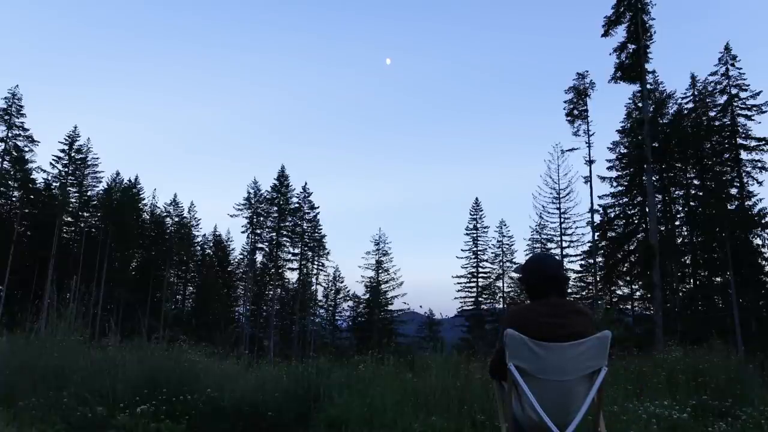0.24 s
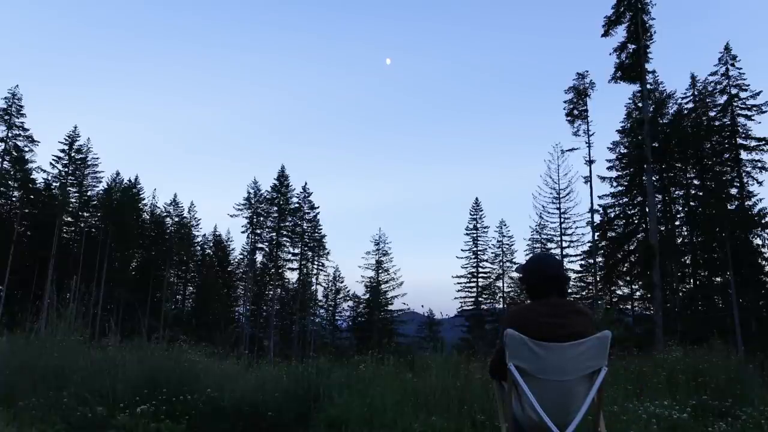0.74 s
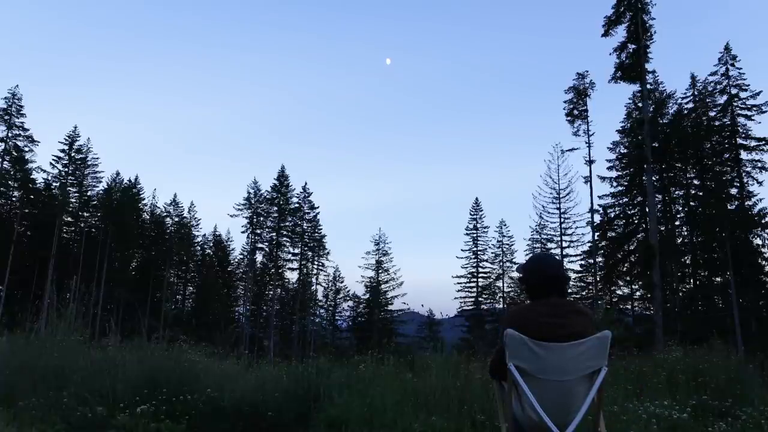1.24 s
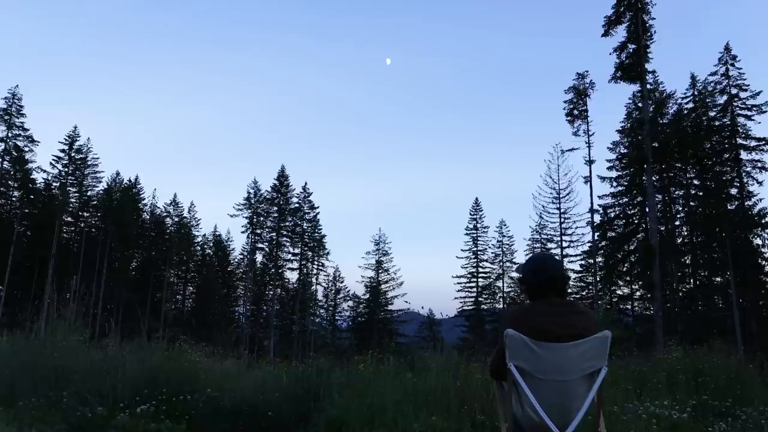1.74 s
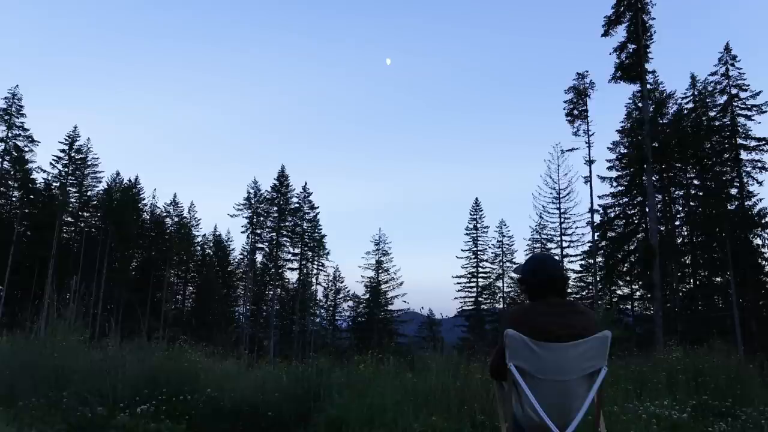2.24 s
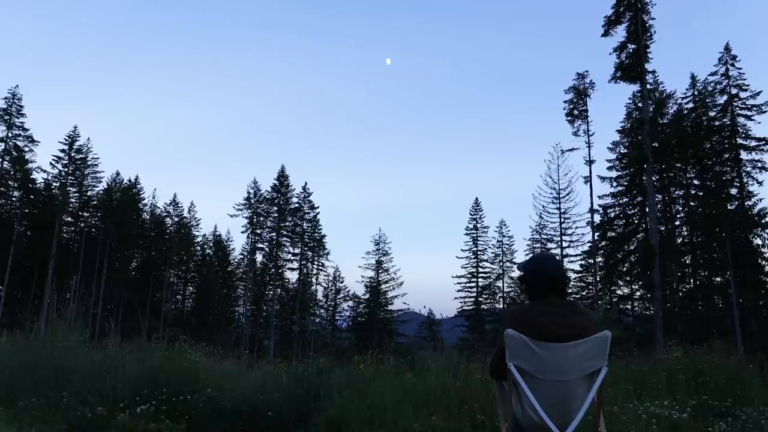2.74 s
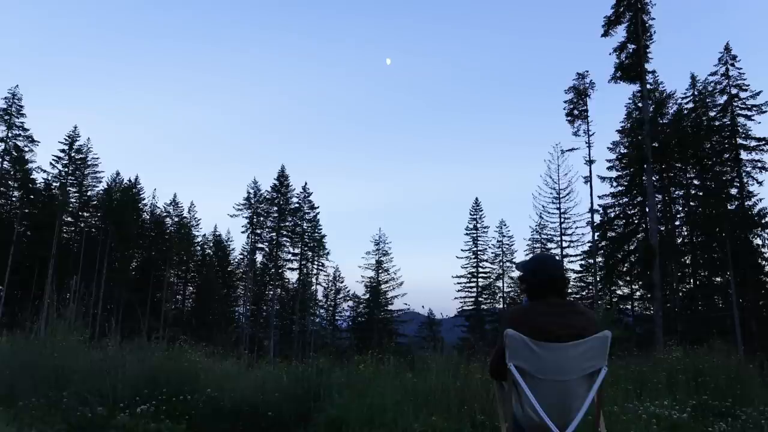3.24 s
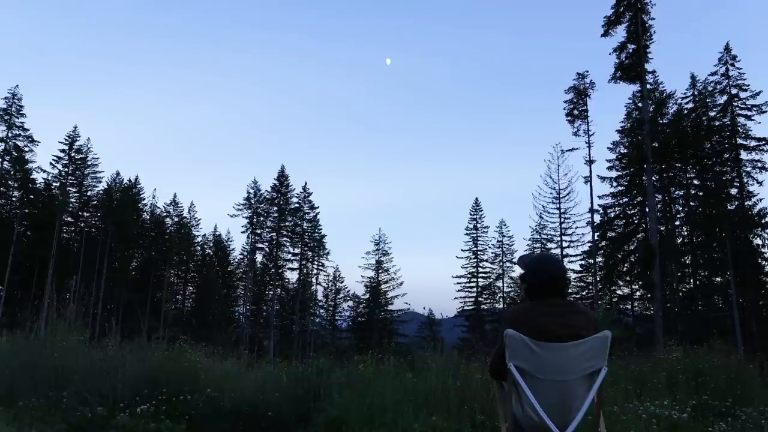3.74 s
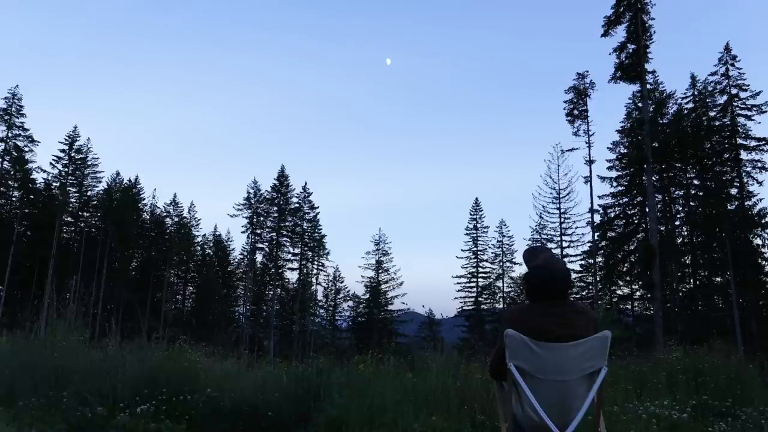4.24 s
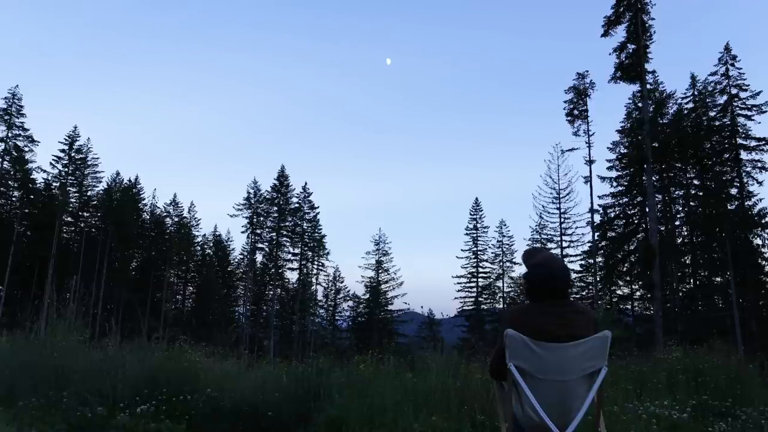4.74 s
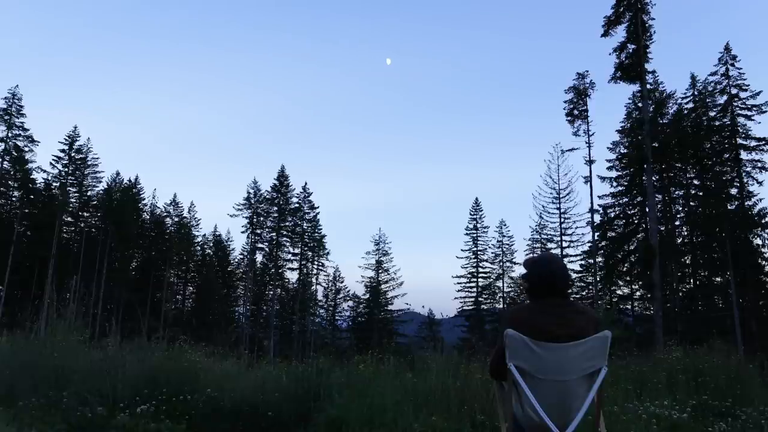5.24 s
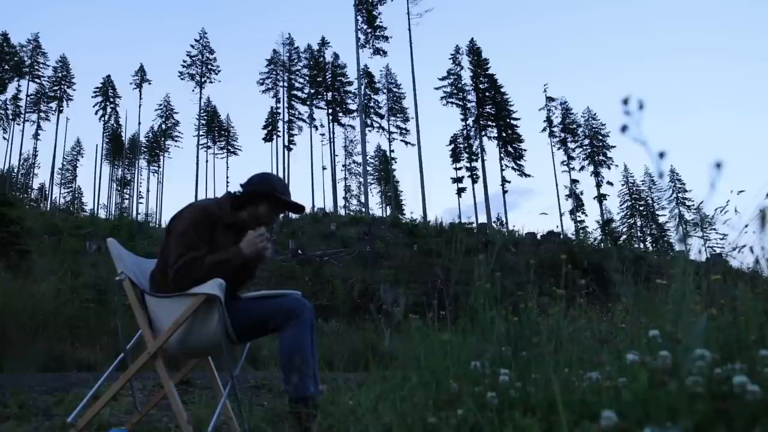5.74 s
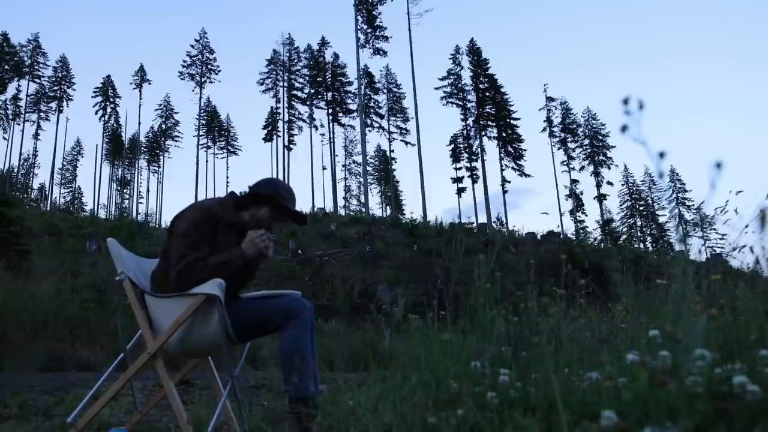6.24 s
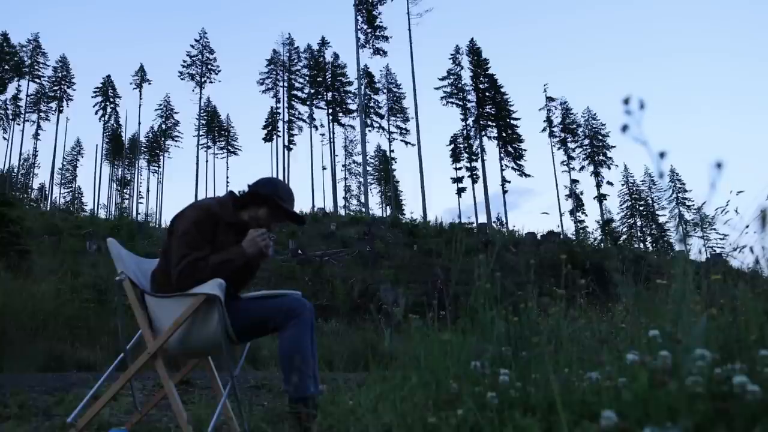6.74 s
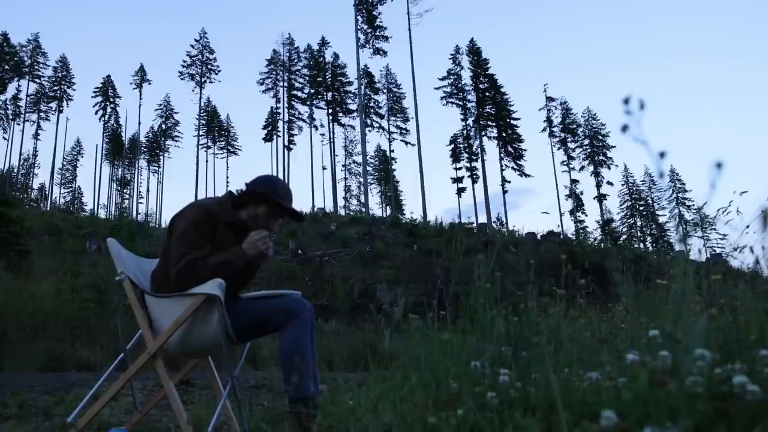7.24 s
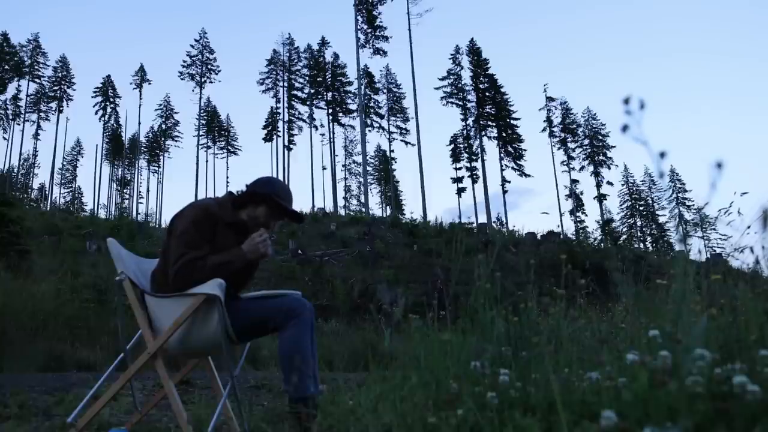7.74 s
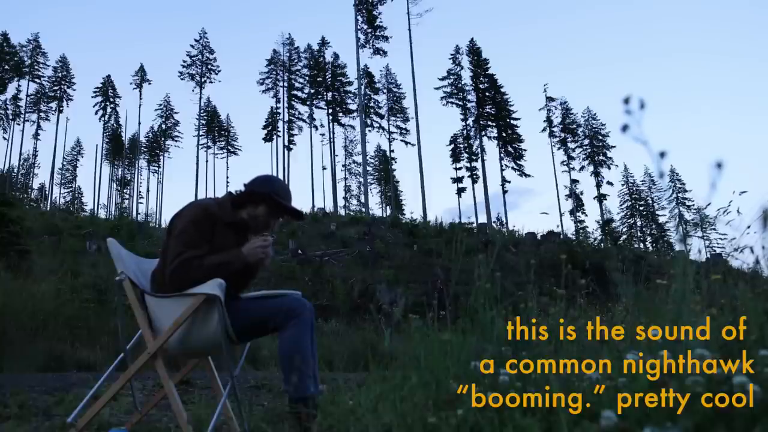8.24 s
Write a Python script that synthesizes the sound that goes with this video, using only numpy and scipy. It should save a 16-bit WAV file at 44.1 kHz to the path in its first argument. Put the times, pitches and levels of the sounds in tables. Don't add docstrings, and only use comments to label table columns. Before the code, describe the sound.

A folding chair snaps loudly, then nasal buzzing nighthawk calls cross a quiet dusk clearing until a diving bird's wings boom at the end.

```python
import sys
import numpy as np
from scipy import signal
from scipy.fft import rfft, irfft, next_fast_len
from scipy.io import wavfile
from scipy.ndimage import uniform_filter1d, map_coordinates

SR = 44100
rng = np.random.default_rng(int(sys.argv[2]) if len(sys.argv) > 2 else 0)


def volts_from_db(level):
    exponent = np.asarray(level, float) / 20
    return 10 ** exponent


def digitize_waveform(pressure):
    field = np.atleast_2d(pressure).T
    bounded = np.clip(field, -1, 1)
    quanta = np.round(bounded * 32767).astype(np.int16)
    wavfile.write(sys.argv[1], SR, quanta)


N = 375291


def unit(x):
    return x / np.sqrt(np.mean(x ** 2) + 1e-20)


def along(points, hz):
    f, v = np.transpose(points)
    return np.interp(np.log(hz + 1), np.log(f + 1), v)


def curves(rows, t):
    s, *cols = np.transpose(rows)
    return [np.interp(t, s, c) for c in cols]


def wobble(rate, size):
    knots = rng.standard_normal(int(size * rate / SR) + 4)
    return map_coordinates(knots, [np.arange(size) * rate / SR])


def filtered(x, response):
    m = next_fast_len(x.shape[-1] + 8192)
    spectrum = rfft(x, m) * response(np.fft.rfftfreq(m, 1 / SR))
    return irfft(spectrum, m)[..., :x.shape[-1]]


def coloured(x, spectrum):
    lo, hi = spectrum[0][0], spectrum[-1][0]
    return unit(filtered(x, lambda hz: volts_from_db(along(spectrum, hz)) * (hz >= lo) * (hz <= hi)))


def add(track, s, x):
    part = track[round(s * SR):][:len(x)]
    part += x[:len(part)]


def swells(rows, rest_db):
    t = np.arange(0, N, 64) / SR
    power = volts_from_db(2 * rest_db)
    for s, spread, db in rows:
        power = power + volts_from_db(2 * db) * np.exp(-((t - s) / spread) ** 2)
    return np.interp(np.arange(N) / SR, t, np.sqrt(power))


def echo(x, t60, gap):
    longest_s = np.clip(np.max(t60, axis=0)[1], .05, 1)
    hz, t, z = signal.stft(rng.standard_normal(round(SR * longest_s)), SR, nperseg=256)
    fade = volts_from_db(-60 * t / along(t60, hz)[:, None])
    tail = signal.istft(z * fade, SR, nperseg=256)[1]
    return signal.fftconvolve(np.pad(x, (round(gap * SR), 0)), tail / np.linalg.norm(tail))


# (time [s], level [dB])
ROAD_LEVEL = [
    (0.0, -60.5),
    (0.09, -63.5),
    (3.65, -56),
    (3.82, -54),
    (5.95, -50),
    (6.71, -51.5),
    (7.27, -52.5),
    (8.51, -49),
]
# (frequency [Hz], level over the traffic [dB], strongest at [s], spread [s], gain there [dB])
ENGINE_LINES = [
    (119.1, -8, 5.9, 0.29, 6),
    (195.2, -9.5, 7.7, 0.84, 11.5),
]
# (time [s], spread [s], level [dB])
AIR_PUFFS = [
    (.42, .15, -57),
    (1.21, .13, -54),
    (3.3, .8, -71),
    (4.66, .1, -55.5),
    (5.5, .1, -65),
    (6.35, .15, -60),
    (7.5, .4, -56.5),
]
# (frequency [Hz], level [dB])
HUM_COLOUR = [(24, -43.5), (40, -9.5), (107, 1), (151, -1), (193, -0.5), (209, -1), (237, -9), (268, -12),
              (489, -29.5), (600, -24), (780, -48), (1320, -120)]
# (frequency [Hz], level [dB])
HISS_COLOUR = [(150, -10.5), (250, -5), (340, -6.5), (418, -7), (569, -10.5), (675, -12), (2280, -18.5),
               (2950, -20.5), (6710, -24), (12900, -37.5), (15000, -45.5)]
# (frequency [Hz], level [dB])
PORT_COLOUR = [(15, 6), (40, -5.5), (80, -9.5), (150, -39.5)]
# (frequency [Hz], level [dB])
APART_COLOUR = [(18, -46.5), (30, -9.5), (110, -7.5), (235, -11), (1080, -14), (1220, -25), (1580, -13.5),
                (5480, -12), (13000, -25.5)]
HISS_DB, HISS_RISE_DB_PER_S = -64.5, 1.1325
CALM_DB = -76.5


def air():
    t = np.arange(N) / SR
    road_db, = curves(ROAD_LEVEL, t)
    hiss_db = HISS_DB + HISS_RISE_DB_PER_S * t
    puffs = swells(AIR_PUFFS, CALM_DB)
    noise = lambda: rng.standard_normal(N)
    hum = volts_from_db(road_db - 0.5 + 2.4 * wobble(2.972, size=N)) * coloured(noise(), HUM_COLOUR)
    for hz, db, s, spread, gain_db in ENGINE_LINES:
        near_db = gain_db * np.exp(-((t - s) / spread) ** 2)
        line = unit(filtered(noise(), lambda f: np.exp(-((f - hz) / 4.9) ** 2)))
        hum = hum + volts_from_db(road_db + db + near_db) * line
    hiss = volts_from_db(hiss_db + .6 * wobble(7.7, size=N)) * coloured(noise(), HISS_COLOUR)
    rumble = puffs * coloured(noise(), PORT_COLOUR)
    side = volts_from_db(hiss_db - 18.0) * coloured(noise(), APART_COLOUR)
    side = side + volts_from_db(-24.5) * puffs * coloured(noise(), PORT_COLOUR)
    return hum + hiss + rumble + np.array([side, -side])


# (time [s], spread [s], rustle level [dB], brightness [dB])
SITTER_SHIFTS = [(.26, 0.14, -80, 28), (.45, 0.079, -63, 11), (.7, 0.16, -69, 14), (.94, 0.038, -66.5, 12),
                 (2.09, .04, -60, 3), (2.4, 0.48, -65.5, -6), (3.45, 0.12, -58.5, 2.5),
                 (4.15, 0.28, -63, 4), (5.06, .16, -53.5, -0.5), (5.44, 0.094, -48, 3),
                 (5.65, .14, -52.5, 0), (6.37, 0.12, -50.5, -2.5), (6.8, 0.35, -56, -0.5),
                 (7.3, 0.37, -69.5, 16.5)]
# (frequency [Hz], level [dB])
FABRIC_COLOUR = [(450, -25), (700, -2.5), (1000, 1), (1400, -5.5), (1700, -20)]
# (frequency [Hz], level [dB])
WEAVE_COLOUR = [(1300, -4.5), (1800, 0), (2500, -1.5), (5000, -12), (9000, -24)]
STILL_DB = -71


def cloth():
    rub = lambda: rng.standard_normal(N) * volts_from_db(1.94 * wobble(45, size=N))
    dull = [row[:3] for row in SITTER_SHIFTS]
    bright = [(s, spread, db + bright_db - 6) for s, spread, db, bright_db in SITTER_SHIFTS]
    body = swells(dull, STILL_DB) * coloured(rub(), FABRIC_COLOUR)
    scratch = swells(bright, STILL_DB + 0.5) * coloured(rub(), WEAVE_COLOUR)
    return body + scratch


def causal(gain):
    c = irfft(np.log(gain + 1e-6))
    half = len(c) // 2
    return np.exp(rfft(np.r_[c[0], 2 * c[1:half], np.zeros(len(c) - half)]))


# (time [s], peak [dB], low knock [dB], bright tick
# [dB])
JOINT_SNAPS = [(0.058, -30, -24, -17), (0.064, -17.5, -25, -10), (0.067, -21, -23, -6),
               (0.07, -20.5, -27, -25), (0.077, -28, -17, -11), (0.084, -18, -16, -13.5),
               (0.097, -24.5, -16.5, -10.5), (0.1349, 1, -14.5, -21), (0.921, -48, -5, -22),
               (0.925, -41.5, -19, -20.5), (0.937, -32.5, -6.5, -10.5), (0.944, -35, -11.5, -27.5),
               (0.123, -21.5, -18, -11),
    (0.132, -31.5, -11, -11),
]
# (frequency [Hz], level [dB])
JOINT_COLOUR = [(240, -66.5), (400, -33.5), (994, 3.5), (1270, 0.5), (1590, -18), (2220, -5), (2870, -18.5),
                (3290, -6.5), (4200, -19), (6510, -18), (8820, -24.5), (9660, -28.5), (15000, -61.5)]
# (time [s], peak [dB], ring [Hz], t60 [s])
FRAME_KNOCKS = [(0.36, -25.5, 1295, 0.025), (0.903, -39, 1190, 0.019), (1.252, -25, 1200, 0.026),
                (1.715, -51.5, 2220, 0.035), (2.047, -39, 710, 0.024), (2.067, -36, 814, 0.024),
                (2.089, -28.5, 2090, 0.016), (2.104, -39.5, 745, 0.021), (3.981, -44, 720, 0.016),
                (4.013, -45, 835, 0.022), (4.209, -53, 600, 0.012), (4.314, -42, 790, 0.019),
                (4.338, -43, 670, 0.017), (4.398, -36.5, 790, 0.018), (4.48, -48, 703, 0.039),
                (4.515, -47, 894, 0.04), (4.602, -37, 915, 0.023), (4.692, -39, 1020, 0.022),
                (4.711, -40.5, 540, 0.019), (5.269, -41, 929, 0.036), (5.704, -30, 776, 0.018),
                (6.194, -42, 700, 0.037), (6.218, -42, 874, 0.043), (6.348, -40, 920, 0.043),
                (7.403, -42.5, 620, 0.06), (7.434, -44, 2324, 0.04), (8.007, -50, 2660, 0.059)]
# (time [s], peak [dB], ring [Hz], t60 [s])
FITTING_PINGS = [
    (.921, -46, 5800, .008),
    (.938, -39, 5900, .01),
    (1.252, -40, 3000, .008),
    (5.769, -33, 5300, .007),
    (7.82, -45, 4400, .007),
    (7.841, -45, 4500, .007),
    (7.987, -42, 4500, .007),
    (8.006, -37, 4500, .007),
]
# (time [s], peak [dB], ring [Hz], t60 [s])
DRY_STEMS = [
    (4.0707, -46, 3780, 0.012),
    (4.103, -44, 2400, 0.01),
    (4.2082, -37.5, 3290, 0.012),
    (4.3268, -34.5, 3230, 0.0082),
    (4.3489, -42, 2850, 0.01),
    (4.3976, -34, 2530, 0.0082),
    (4.4682, -47, 2560, 0.011),
]


def joint_snap(low_db, high_db, t):
    crack = rng.standard_normal(len(t)) * (volts_from_db(-60 * t / 0.0065) + volts_from_db(-18.5 - 60 * t / 0.069))
    crack[0] = 9
    tilt = [(300, -20), (1000, low_db + 5.5), (2600, -3.0), (7000, high_db + 14.5)]
    snap = filtered(crack, lambda hz: causal(volts_from_db(along(JOINT_COLOUR, hz) + along(tilt, hz))))
    return snap / np.abs(snap).max()


def knock(hz, t60, t):
    ring = np.sin(2 * np.pi * hz * t)
    ring = ring + 0.23 * np.sin(2 * np.pi * 1.137 * hz * t) * rng.normal(1, 0.1)
    ring = ring * volts_from_db(-60 * t / t60) * (1 - np.exp(-t / 0.0003)) ** 2
    contact = volts_from_db(-60 * t / .006) * (1 - np.exp(-t * 2500))
    return ring + .06 * contact * coloured(rng.standard_normal(len(t)), WEAVE_COLOUR)


def chair():
    out, t = np.zeros(N), np.arange(SR // 8) / SR
    for s, db, low_db, high_db in JOINT_SNAPS:
        add(out, s, volts_from_db(db) * joint_snap(low_db, high_db, t))
    for s, db, hz, t60 in FRAME_KNOCKS + FITTING_PINGS + DRY_STEMS:
        add(out, s, volts_from_db(db) * knock(hz, t60, t))
    return out + volts_from_db(-27.5) * echo(out, [(500, 0.28), (3000, 0.31), (9000, 0.49)], gap=0.014)[:N]


BUZZ_HZ, DROP_SHARE = 227, .54
ATTACK_S, ATTACK_DB, RELEASE_S, RELEASE_DB = .03, -17, .028, -18
ARCH_HZ, ARCH_S, UPTURN_HZ = 420, .036, 300


def peent(length, db, swell_db, held_hz, closing_hz, reach_hz, skirt, glide_hz, hoarse):
    age = np.arange(0, length, 1 / SR)
    size, part = len(age), age / length

    closed = np.interp(part, [0, DROP_SHARE, DROP_SHARE + .25, 1], [0, .24, 1, .9])
    closed = uniform_filter1d(closed, size=901, mode="nearest")
    shut = np.exp(-(age / .014) ** 2)
    tip = np.clip((part - .82) / .18, 0, 1) ** 1.5
    beak = held_hz - closed * (held_hz - closing_hz) - glide_hz * shut

    whistle = held_hz + .58 * (beak - held_hz) + 160 * hoarse * wobble(149.65, size=size)
    whistle = whistle - ARCH_HZ * np.exp(-age / ARCH_S) + UPTURN_HZ * tip
    whistle = whistle + 40 * np.sin(2 * np.pi * 17 * age + 0.86 * wobble(8.85, size=size))
    rate = BUZZ_HZ * (1 + (0.0074 + 0.034 * hoarse) * wobble(67.7, size=size))

    k = np.arange(-24, 21)[:, None] / 2
    off = whistle + k * rate - beak
    reach = reach_hz * (1 - 0.5 * closed) / (1 + tip + 0.24 * shut)
    above = -9 * (off / reach) ** 2
    below = skirt * (1 + 0.77 * closed + 4 * tip + .6 * shut) * off / 1000
    spray = -16 - 12 * closed - 20 * shut - 6.5 * off / reach_hz
    shape = np.maximum(np.where(off > 0, above, below), np.where(off > 0, spray, -90))
    floor_hz = 2750 - glide_hz * np.exp(-age / 0.019)
    shape = shape - 12 * (np.maximum(floor_hz - beak - off, 0) / 300) ** 2

    uneven = 1.6 * hoarse ** 2 * (1 - .7 * closed) * np.abs(1 + .9 * wobble(55, size=size))
    halves = np.where(k % 1 == 0, 1, uneven)
    phase = 2 * np.pi * np.cumsum(whistle + k * rate, axis=1) / SR
    phase = phase + (0.08 + 0.17 * closed) * k ** 2
    wave = np.sum(volts_from_db(np.maximum(shape, -90)) * halves * np.exp(1j * phase), axis=0)
    wave = wave / np.sqrt(uniform_filter1d(np.abs(wave) ** 2, size=801) + 1e-9)
    voice = wave.real + volts_from_db(-43.0) * (wave ** 2).real

    ends = np.clip(np.minimum(age, age[::-1]) / .009, 0, 1)
    level_db = np.interp(age, [0, ATTACK_S, length - RELEASE_S, length], [ATTACK_DB, 0, 0, RELEASE_DB])
    level_db = level_db + swell_db * (part + closed - 1) / 2
    return volts_from_db(db + level_db) * ends * unit(voice)


# (time [s], length [s], level [dB], held whistle [Hz], comb spacing of the ground bounce [Hz])
LOW_CALLS = [
    (0.415, 0.36, -49, 3970, 784),
    (1.343, .25, -45, 4190, 746),
    (2.622, 0.36, -44.5, 4540, 657),
    (4.545, 0.37, -47, 4030, 780),
    (5.492, .3, -46.5, 4425, 522),
    (6.116, 0.24, -63, 4560, 740),
    (6.443, 0.34, -49, 4240, 665),
    (7.06, 0.35, -36.5, 4390, 586),
]
# (time [s], length [s], level [dB], held whistle [Hz], swell [dB])
HIDDEN_CALLS = [
    (1.86, 0.18, -63.5, 4140, 11.5),
    (2.05, 0.2, -73.5, 4270, 7),
    (3.34, 0.1, -60, 4140, -6),
    (4.82, 0.19, -42.5, 4094, -1.5),
    (5.34, .23, -44, 4166, 6),
    (6.88, .24, -45.5, 4383, -2),
]
# (time [s], length [s], level [dB], held whistle [Hz], swell [dB])
OVERHEAD_CALLS = [
    (3.486, .2, -33, 4343, 2),
    (4.958, .2, -31, 4210, 0.5),
    (8.006, .208, -23.5, 4300, 0.5),
]
# (closing whistle [Hz], upper reach [Hz], lower skirt [dB per kHz],
# opening glide [Hz], hoarseness [0-1])
GROUP_THROATS = [
    (3645, 726, 11, 2700, .3),
    (3560, 584, 10.5, 878, 0.2),
    (3574, 630, 11.5, 717, 0.67),
]
# (near scatter [dB], tree-line echo [dB])
GROUP_PLACES = [
    (-6.5, -20.5),
    (-12.5, -26),
    (0.5, -1),
]
GROUND_BOUNCE = [
    .08,
    .72,
    .2,
]
# (frequency [Hz], t60 [s])
BRUSH_DECAY = [(300, 0.053), (9000, .08)]
# (frequency [Hz], t60 [s])
TREE_DECAY = [(300, .5), (3000, 1.93), (5000, 1.68), (9000, 0.97)]
HIGH_COMB_HZ, LEVEL_COMB_HZ, SWELL_DB_PER_HZ, ECHO_LAG = 474, 740, 0.1027, 1.16
PATH_DRIFT, LEAF_BLUR_HZ = .015, 320


def nighthawks():
    out = np.zeros(N)
    overhead = [(*row, HIGH_COMB_HZ) for row in OVERHEAD_CALLS]
    low = [(*row[:4], SWELL_DB_PER_HZ * (LEVEL_COMB_HZ - row[4]), row[4]) for row in LOW_CALLS]
    hidden = [(*row, HIGH_COMB_HZ) for row in HIDDEN_CALLS]
    groups = zip([overhead, low, hidden], GROUP_THROATS, GROUND_BOUNCE, GROUP_PLACES)
    for calls, throat, bounce, (near_db, far_db) in groups:
        for s, length, db, held_hz, swell_db, comb_hz in calls:
            call = peent(length, db, swell_db, held_hz, *throat)
            n = np.arange(len(call))
            lag = SR / comb_hz * (1 + PATH_DRIFT * np.linspace(-1, 1, len(call)))
            off_ground = map_coordinates(call, [n - lag])
            call = (call + bounce * off_ground) / np.hypot(1, bounce)
            blurred = call * wobble(LEAF_BLUR_HZ, size=len(call))
            add(out, s, call)
            add(out, s, volts_from_db(near_db) * echo(call, BRUSH_DECAY, gap=0.0033))
            add(out, s, volts_from_db(far_db - ECHO_LAG * swell_db) * echo(blurred, TREE_DECAY, gap=.05))
    return out


# (time [s], pitch [Hz], level [dB])
WING_BOOM = [
    (8.118, 439.7, -56),
    (8.14, 440.6, -30),
    (8.156, 438.5, -22.5),
    (8.266, 433.4, -34.5),
    (8.384, 407.8, -28.5),
    (8.458, 414, -32),
    (8.51, 432, -48),
]
# (frequency [Hz], level [dB])
WING_COLOUR = [(150, -48), (260, -37.5), (305, -6.5), (380, -10), (421, -9.5), (604, -16), (737, -16),
               (833, -21.5), (1160, -19.5), (1420, -31), (1710, -27), (2500, -41.5), (3250, -68),
               (5500, -120)]
RATTLE_DB, RATTLE_FADE_DB_PER_S = -29, 17


def boom():
    t = np.arange(WING_BOOM[0][0], N / SR, 1 / SR)
    age, size = t - t[0], len(t)
    sing_hz, sing_db = curves(WING_BOOM, t)
    sharp_hz = 110 * np.exp(-age / .012)
    cycles = np.cumsum((sing_hz + sharp_hz) / 5) / SR
    sing = np.sqrt(2) * volts_from_db(sing_db + 1.5 * wobble(60, size=size))
    sing = sing * np.sin(2 * np.pi * 5 * cycles + .55 * wobble(45, size=size))
    loose = cycles + 0.12 * wobble(70, size=size)
    slaps = (np.diff(np.floor(loose), prepend=0) > 0) * volts_from_db(2.0 * rng.standard_normal(size))
    slaps[SR // 130] = 3.5
    gusts = np.exp(0.5 * np.cos(2 * np.pi * loose)) * rng.standard_normal(size)
    rattle = coloured(unit(slaps) + 2.2 * unit(gusts), WING_COLOUR)
    rattle = volts_from_db(RATTLE_DB - RATTLE_FADE_DB_PER_S * age) * rattle
    fade_in = np.clip(age / 0.014, 0, 1)
    fade_out = np.clip((t[-1] - t) / 0.075 + 0.39, 0, 1)
    out = np.zeros(N)
    add(out, t[0], (sing + rattle) * fade_in * fade_out)
    return out


def scene():
    mid = cloth() + chair() + nighthawks() + boom()
    side = volts_from_db(-45) * echo(mid, BRUSH_DECAY, gap=0)[:N]
    return np.array([mid + side, mid - side]) + air()


def low_pass(x):
    return signal.sosfilt(signal.butter(12, 16330, fs=SR, output="sos"), x)


def record(dry):
    rounded = dry / (1 + np.abs(dry / .93) ** 6) ** (1 / 6)
    mix = filtered(rounded, lambda hz: 1 / (1 + (hz / 14800) ** 24))
    return low_pass(mix)


dry = scene()
out = record(dry)
digitize_waveform(out)
```